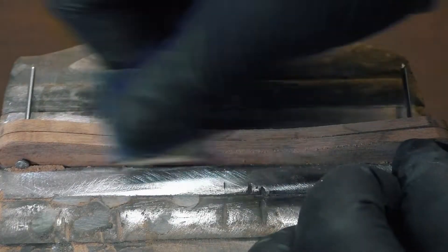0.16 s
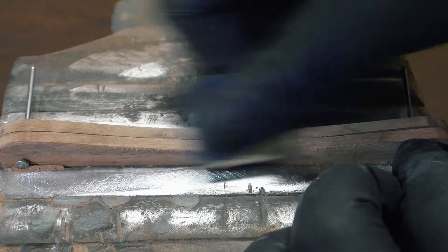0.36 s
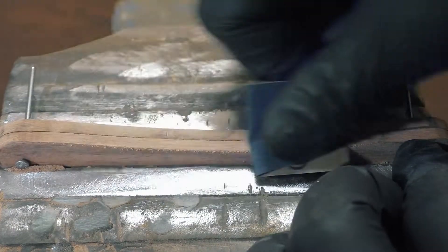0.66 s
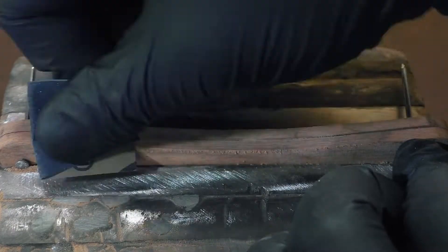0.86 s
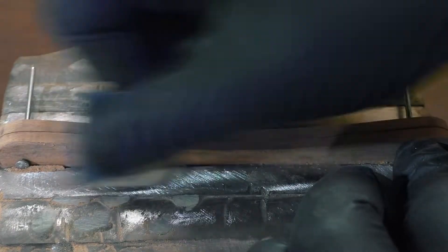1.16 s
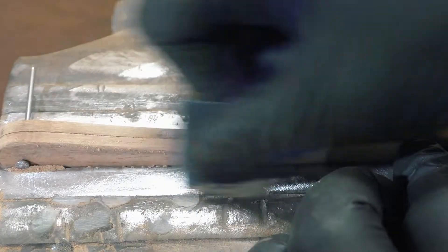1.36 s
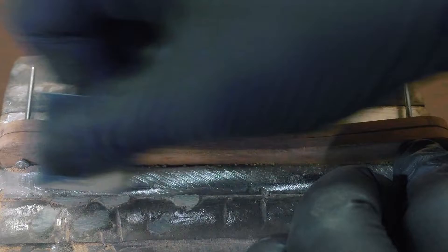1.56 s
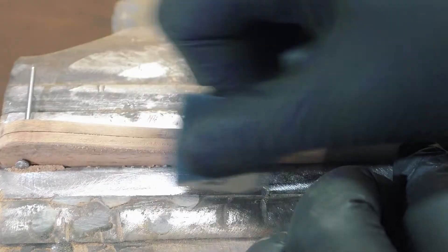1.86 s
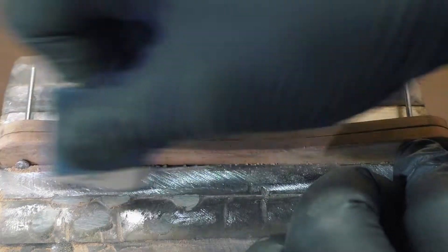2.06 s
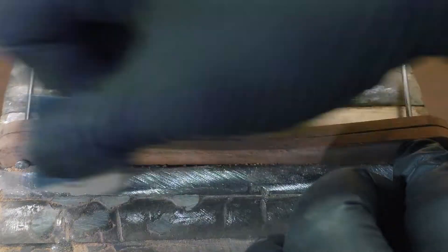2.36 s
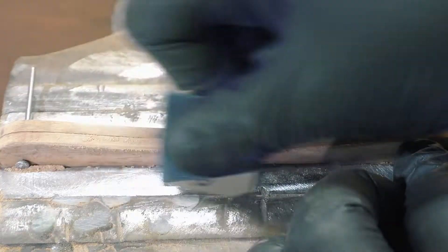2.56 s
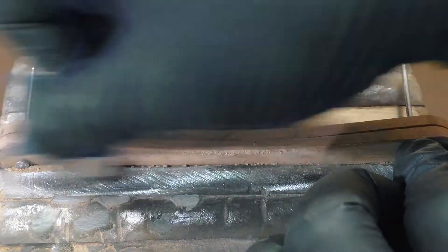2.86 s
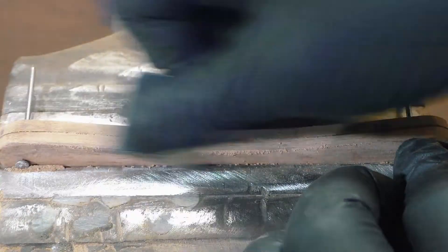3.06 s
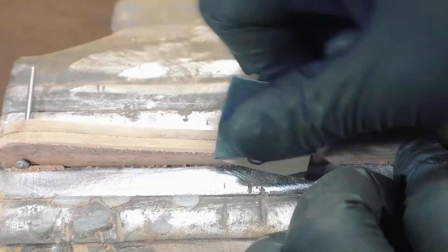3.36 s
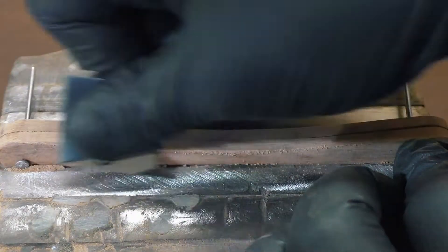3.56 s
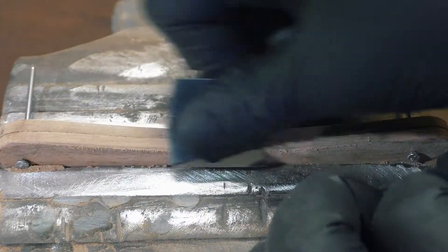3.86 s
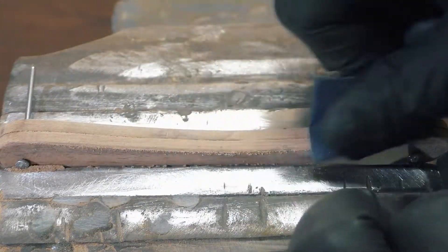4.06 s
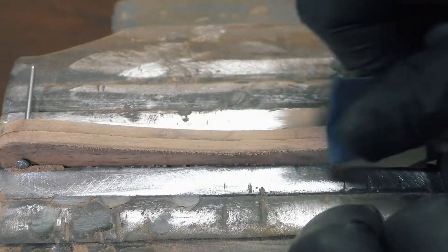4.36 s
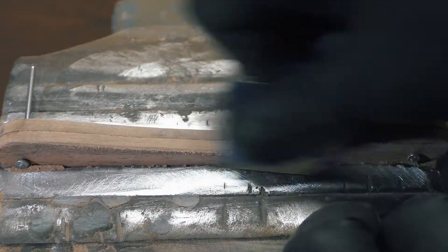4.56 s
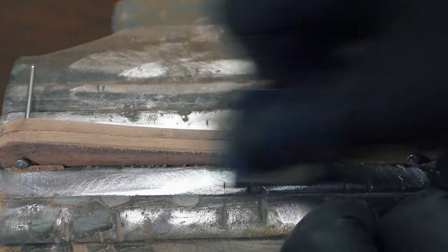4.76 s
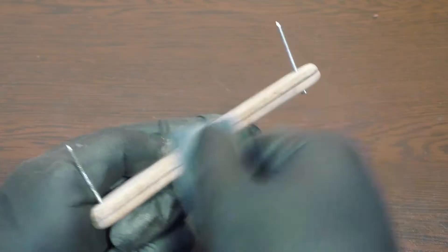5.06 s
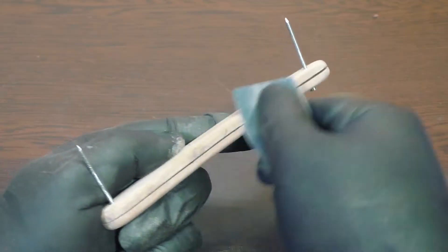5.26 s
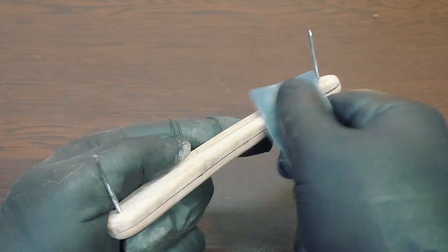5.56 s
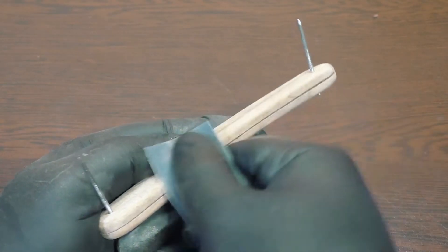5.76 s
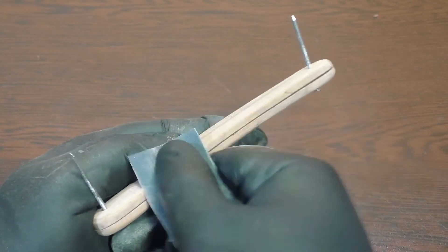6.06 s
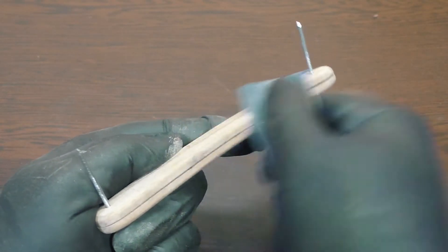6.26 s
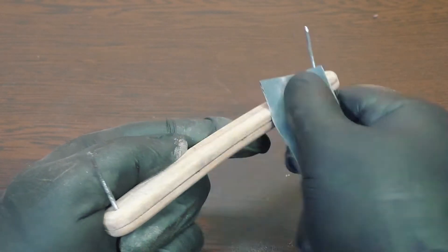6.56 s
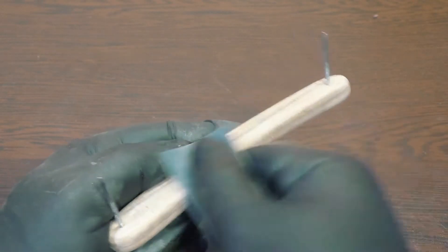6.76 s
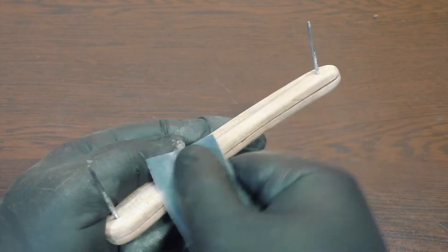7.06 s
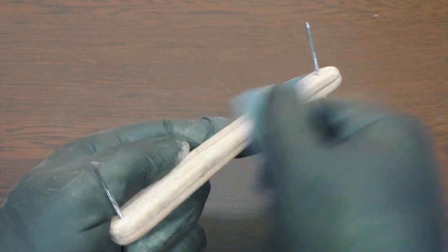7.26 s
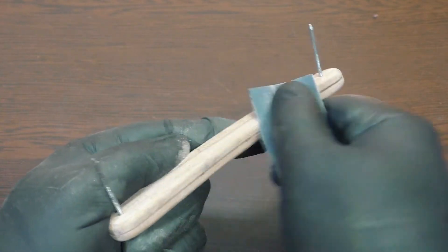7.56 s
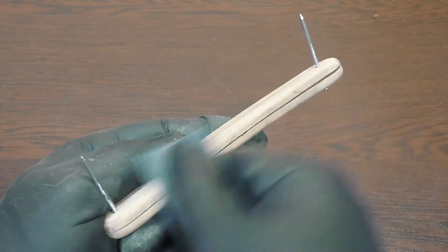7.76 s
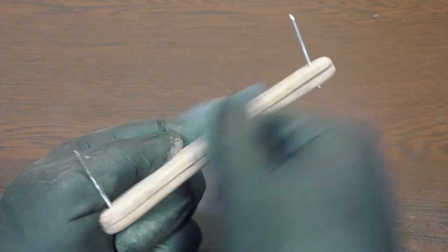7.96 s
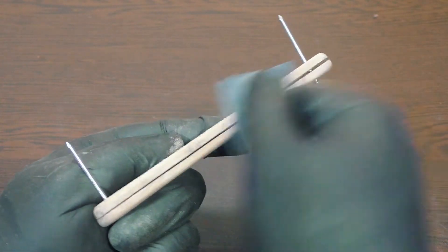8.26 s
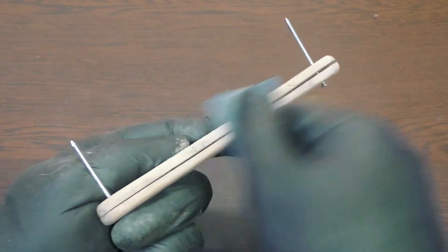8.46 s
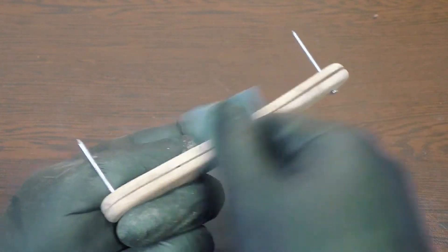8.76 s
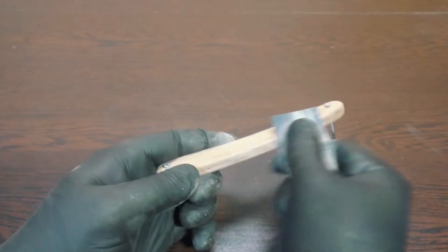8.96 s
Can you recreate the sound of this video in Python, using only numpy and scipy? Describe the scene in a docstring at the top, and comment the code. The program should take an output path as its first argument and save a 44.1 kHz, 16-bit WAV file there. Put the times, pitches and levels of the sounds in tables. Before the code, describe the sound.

Steady quick sanding, five or six strokes a second, each a swelling gritty hiss that nearly stops at the turn. First thin and airy on a vice, then slightly louder, with a hollow woody midrange when hand-held. Short squeaky snags, small clicks and light knocks interrupt it; gloved hands add barely audible dull rustle. Close microphone, slightly left, with only a faint room tail.

```python
"""You first hear sandpaper rubbed to and fro on a small wooden handle, close by, on a steel vice; later it is held in hand.
Each stroke is made from grit noise that follows the speed and pressure of the hand and rings the wood and the paper.
The paper snags, coarse grains snap and the handle knocks, each with a burst or a short ring.
Gloved hands add dull noise and soft thuds. The rubbing is a little hollow; a faint room tail follows it."""
import sys
import numpy as np
from scipy import signal
from scipy.fft import rfft, irfft, next_fast_len
from scipy.io import wavfile
from scipy.ndimage import uniform_filter1d, map_coordinates

SR = 44100
rng = np.random.default_rng(int(sys.argv[2]) if len(sys.argv) > 2 else 0)


def int16_out(signal):
    """Quantize to a 16-bit WAV file."""
    q = np.round(np.clip(np.atleast_2d(signal).T, -1, 1) * 32767)
    wavfile.write(sys.argv[1], SR, q.astype(np.int16))


N = 402633  # length [samples]

# Strokes, to and fro in turn; levels are relative:
# (start [s], pressure [dB], lean towards the stroke's end [dB], wood ring [dB], paper ring [dB])
STROKE_TABLE = [(-0.011, -44.5, 1.5, 7.5, 8.5), (0.168, -42.5, 3.5, -0.5, 11),
                (0.354, -38.0, 3.5, -5.5, 6.5), (0.554, -37, 3.5, -3.5, 6), (0.74, -43, -2, 0.5, 8),
                (0.929, -42, 3, -1.5, 1.5), (1.11, -42, 4.5, 2, 4.5), (1.299, -43, 5.5, 1.5, 15.5),
                (1.486, -43.5, -10, 4.5, 11.5), (1.692, -46.5, 11.5, 6, 11.5),
                (1.882, -43.0, -1.5, 6.5, 11.5), (2.07, -45.0, 2.5, 2.5, 4.5), (2.264, -42.0, 0, 5.0, 10.5),
                (2.487, -52, 4.5, 12.5, 15.5), (2.654, -50, -9, 11.5, 13.5), (2.851, -40.5, 5, 0, 1.5),
                (3.051, -39.0, 0, -1, 1.5), (3.238, -40, 0, 0, 5.5), (3.438, -43, -2, 2.5, 1.5),
                (3.597, -42.5, 5, 1.0, 5.5), (3.797, -44.5, -2.5, 2, 10), (3.945, -40.5, 1, -1.5, 2),
                (4.109, -42.5, 1, -0.5, 2.5), (4.255, -40.5, 0, -1, 3), (4.409, -43.5, 3.5, 2.5, 2.0),
                (4.569, -41.5, 0, 2, 6.5), (4.726, -43.5, 5, 3, 1.5), (4.885, -41.0, -0.5, 2.0, 3),
                (5.049, -35.5, 2, -5, 1), (5.186, -39.5, -1.5, -1, 3), (5.361, -41.5, -1.5, 6.5, 5.5),
                (5.502, -42.5, 0.5, -1.5, 2), (5.651, -42, 2.5, 1, 3), (5.823, -37.0, 1.5, -2.5, 5.5),
                (5.98, -34, 1.5, -9.5, 4), (6.138, -38.0, 1, -4.5, 2.5), (6.297, -36.0, 4, -9, 1.5),
                (6.47, -35.5, 2.5, -9.5, 0.5), (6.638, -43.5, 0.5, 2.5, 6.5),
                (6.799, -41.5, -0.5, 0.5, 2.0), (6.959, -40.5, 5, 3.0, 3.5), (7.124, -38.5, 2.5, -5.5, 1.5),
                (7.281, -41.5, 0, 3.5, 4.5), (7.45, -40, -1, -3.5, 3), (7.619, -41, 2.5, -1, 3.5),
                (7.787, -39.5, -1, -1, 1.0), (7.955, -39.5, 3, -3, 1.0), (8.124, -39.0, -0.5, -5.0, 0.5),
                (8.289, -37.5, 2.5, -7.5, 1.5), (8.438, -35.5, 1, -8, -2), (8.599, -39.5, 3.5, -2.5, -1.0),
                (8.757, -43.0, 6, 10, 1.5), (8.835, -42.5, -6.5, -7.5, -2.5),
                (8.897, -43.5, -2.5, -10.5, -8.5), (9.019, -44, -2, -14, -7)]
LAST_STROKE_END_S = 9.145
IN_HAND_S = 5.046  # from here the handle is held in the hand instead of on the vice

# Basic colour of the rubbing in each position: (frequency [Hz], relative level [dB])
VICE_COLOUR = [(200, -27), (600, -34.5), (850, -28), (1300, -13.5), (2000, -10), (2600, -8), (3500, -6),
               (5000, -8.5), (6200, -9.5), (8300, 0.5), (11000, 1.5), (13500, -3), (15700, -10)]
HAND_COLOUR = [(200, -60), (600, -33), (850, -22.5), (1200, -7.5), (1900, -9.5), (2250, -2.5), (2700, -5.5),
               (4400, -2.5), (5300, -8.5), (7200, -6.5), (8600, 0.5), (11000, 3), (15700, -5.5)]

# The paper's edge catches and the scrape flares:
# (time [s], half length [s], boost [dB], centre [Hz], width [natural log of frequency ratio])
SNAG_TABLE = [(.392, .028, 12, 3200, 0.38), (.525, 0.027, 7, 1400, 0.33), (1.257, 0.015, 8.5, 9000, 1.35),
              (1.26, 0.054, 13, 1400, 0.37), (1.322, 0.018, 6, 5000, 0.92), (1.345, 0.033, 9.5, 1600, 0.31),
              (2.297, 0.034, 12.5, 2060, 0.34), (2.46, 0.039, 5.5, 1270, 0.27),
              (3.408, .02, 9.5, 3000, 0.69), (3.735, 0.036, 8.5, 3000, 0.73),
              (5.143, 0.023, 12, 1170, 0.64), (5.459, 0.029, 8, 2700, 0.34), (6.76, 0.023, 8, 2400, .4),
              (7.1, 0.0084, 10, 2490, 0.34), (7.415, 0.0092, 9, 6000, 2.8), (7.751, 0.017, 15, 2420, 0.17),
              (7.762, 0.023, 17, 5700, 0.21), (7.816, 0.016, 15.5, 2350, .16),
              (8.095, .017, 12.5, 2320, 0.12), (8.818, 0.007, 1, 5000, 0.84)]

# Coarse grains snap and the handle is knocked: (time [s], snap, relative [dB], knock, relative [dB])
TICK_TABLE = [(.383, -42, -50), (1.259, -25, -58), (1.538, -23, -58), (1.577, -21, -58), (5.059, -58, -46),
              (5.075, -52, -29.5), (5.782, -46, -42), (5.799, -31, -27.5), (6.044, -30, -50),
              (8.826, -40, -41)]

# What the handle rings with, damped by the glove: (frequency [Hz], relative level [dB], time to fall 60 dB [s])
HANDLE_MODES = [(1276, -7, .011), (1800, -5, .006), (2305, -3, .028), (2900, -3, .006), (3731, -9, .01),
                (4400, -16, .015)]

# Colours of the hands' dull noise and of their deep thud: (frequency [Hz], relative level [dB])
HANDLING_COLOUR = [(70, -15), (120, -4.5), (180, -2), (300, -2.5), (450, -3), (580, -11.5), (800, -9.5),
                   (1500, -7.5), (4000, -35)]
THUD_COLOUR = [(15, -25), (35, -4), (55, -7.5), (80, -1.5), (120, -14), (220, -28), (600, -60)]

# Where the pad works, as a level difference: (time [s], left minus right [dB])
PAD_PAN = [(0, 2.2), (1.3, 3.1), (3.2, 3.1), (3.8, 1.7), (4.8, 2), (5.1, 2.8), (8.2, 3), (9.13, 2.3)]

# Sound the two microphone ports do not share: (frequency [Hz], unshared against shared sound [dB])
PORT_WIDTH = [(100, -4), (300, -4.5), (600, -6), (1000, -8), (2000, -18.5), (4000, -15.5), (8000, -29.5),
              (13000, -11)]
# Colour difference between the ports: (frequency [Hz], left minus right [dB])
PORT_BALANCE = [(60, 1), (250, -0.7), (600, -1.5), (1000, -5.5), (2000, -2.6), (7000, -3.4), (13000, -1.1)]

# A piece this small radiates almost no bass: (frequency [Hz], level [dB])
SMALL_PIECE_COLOUR = [(200, -40), (650, -25), (1200, -9.5), (2000, -3.5)]

# The scrape's level dips briefly: (from [s], to [s])
DIP_SPAN = (8.827, 8.844)

# Strength of the delayed copy that makes the hollow colour: (frequency [Hz], delayed share [dB])
HOLLOW_COLOUR = [(60, -7.5), (350, -3), (1100, -9), (3000, -9.5), (12000, -9.5)]
HOLLOW_DELAY_S = .017415

# Wood resonances that sway as the pad travels; the hand's peaks and swings are scaled by the ring depth below:
# (centre [Hz], sway [Hz], width [Hz], peak [dB], swing of the peak [dB])
VICE_RESONANCES = [(1570, -70, 450, 0.5, 0.5), (3040, 204, 500, -2, 2.5), (4880, -300, 300, 3, -1.5)]
HAND_RESONANCES = [(2310, 50, 65, 1.9, 0.36), (4280, 77, 380, 0.93, 1)]

# Each way of holding the paper lasts for a run of strokes: (from [s], paper resonance [Hz],
# treble tilt [dB per octave], creep left at the turns [dB], extra wood ring at the far end [dB])
GRIP_TABLE = [(0, 3200, -.5, -20, 4), (1.3, 5630, 4, -21, 2.3), (2.85, 3240, -2, -17, 1.7),
              (3.95, 3200, -3, -21.5, 0.5), (5.05, 4630, -1, -20.5, 1.7), (5.5, 2970, -2.5, -18, -0.7),
              (6.64, 3850, -3, -16.5, 0.5), (8.83, 2970, -2.8, -7, 6.5)]

# The gloves shift or ease their hold and the dull noise swells or sinks:
# (time [s], half length [s], boost [dB], centre [Hz], width [natural log of frequency ratio])
GLOVE_SHIFTS = [(1.3, 0.072, 7, 170, 1.2), (3.21, 0.092, 8.5, 350, .7), (3.59, 0.14, 10, 400, .9),
                (4.15, 0.064, 15, 240, 1), (4.38, 0.11, 8, 270, .6), (4.94, .09, 17, 78, 0.37),
                (5.42, .06, 6.5, 200, 0.83), (5.74, 0.13, 10, 169, 0.58), (7.4, 0.043, 6, 110, 1.0),
                (7.75, 0.053, 9, 100, .9), (7.86, 0.091, 12, 292, 0.3), (8.25, 0.2, 8.5, 90, 1),
                (8.8, 0.036, 14, 600, 0.66), (9.0, .16, 7, 58, .35), (9.06, .16, -6, 280, .9)]

FRAME, HOP = 512, 128  # short overlapping slices for colouring the scrape [samples]
TOP_HZ = 15800  # the finished sound is cut above this
BITE_DB, WOOD_BITE_DB = 1.5, 3.5  # grit bites and wood is shaken harder near the turns
LEAN_IN_WOOD = 0.12  # share of the hand's lean that the wood ring follows
OUTWARD_TILT_DB = 1.05  # per octave: outward strokes are brighter, return strokes duller
LATE_PEAK = 0.029  # slow gathering, fast braking: shift of the top speed, as a share of the stroke
DULLEST_SPEED = 0.16  # share of the top speed below which the hiss gets no duller
PAPER_GLIDE = 0.029  # how far the paper's broad resonance follows the pad, as a share of its pitch
LOOSE_RING = .08  # per dB of wood ring: a loosely held handle rings with taller peaks
RING_DEPTH = 1.5  # height factor of the hand-held resonances at zero wood ring


def undb(db):
    """Turn decibels into gain."""
    return 10 ** (np.asarray(db) / 20)


def colour(points, hz):
    """Read the level in dB between colour points, on a logarithmic frequency scale."""
    point_hz, point_db = np.transpose(points)
    return np.interp(np.log(np.maximum(hz, 1)), np.log(point_hz), point_db)


def tint(x, points):
    """Filter a sound by making each frequency stronger or weaker."""
    size = next_fast_len(N + 4096)
    hz = np.arange(size // 2 + 1) * SR / size
    return irfft(rfft(x, size) * undb(colour(points, hz)), size)[..., :N]


def walk(rate_hz):
    """Wander between random points, rate_hz of them each second, with a spread near 1."""
    steps = rng.standard_normal(N // 8)
    return 1.06 * np.interp(np.arange(N) / SR * rate_hz, np.arange(len(steps)), steps)


def ports(pair):
    """Make left and right from a shared sound and an unshared one of opposite sign."""
    side = tint(pair[1], PORT_WIDTH)
    return np.array([pair[0] + side, pair[0] - side])


def travel(t):
    """Count strokes done so far and swing the pad like a pendulum: place 1 is near, -1 is far."""
    turns = np.r_[np.array(STROKE_TABLE)[:, 0], LAST_STROKE_END_S]
    stroke = np.interp(t, turns, np.arange(len(turns)))
    return stroke, np.cos(np.pi * stroke)


def flares(rows, hz, t):
    """Give brief level changes in dB, each in its own part of the spectrum."""
    s, half, boost_db, centre, width = np.transpose(rows)
    in_time = np.exp(-np.minimum(((t[:, None] - s) / half) ** 2, 20))
    in_pitch = np.exp(-(np.log(hz / centre) / width) ** 2)
    return boost_db * in_pitch @ in_time.T


def room(x, t60_s, wet_db):
    """Walls send back a faint fading tail of noise, different at each port."""
    t = np.arange(SR // 2) / SR
    tail = rng.standard_normal((2, len(t))) * undb(-60 * t / t60_s)
    tail *= undb(wet_db) / np.sqrt(np.sum(tail ** 2, axis=1, keepdims=True))
    return x + signal.fftconvolve(x, tail, axes=1)[:, :N]


def hollow(x):
    """A weaker, coloured copy just behind the sound strengthens and weakens evenly spaced frequencies."""
    lag = int(round(HOLLOW_DELAY_S * SR))
    late = np.pad(tint(x, HOLLOW_COLOUR), ((0, 0), (lag, 0)))
    return x + late[:, :N]


def hands(handling_db, thud_db, far_turn_db, palm_hz, palm_db):
    """Gloves and work shift under the strokes: dull noise over a deep thud."""
    noise = 0
    for points, level_db in ((HANDLING_COLOUR, handling_db), (THUD_COLOUR, thud_db)):
        layer = tint(rng.standard_normal((2, N)), points)
        noise = noise + layer / layer.std() * undb(level_db)
    hz, t, frames = signal.stft(noise, SR, nperseg=2048)
    hz = np.maximum(hz, 1)[:, None]
    # on the vice the work is pushed hardest at the far turn; in the hand, the palm adds a low boom
    pushed = -far_turn_db * travel(t)[1]
    palm = palm_db / (1 + (hz / palm_hz) ** 4)
    db = np.where(t < IN_HAND_S, pushed, palm) + flares(GLOVE_SHIFTS, hz, t)
    sound = signal.istft(frames * undb(db), SR)[1]
    return ports(sound[:, :N])


def ticks(snap_hz, snap_t60_s, splinter_db):
    """A coarse grain gives a very short, slightly noisy snap; a knock makes the handle ring."""
    t = np.arange(4096) / SR
    ring = sum(undb(db - 60 * t / t60) * np.sin(2 * np.pi * hz * t) for hz, db, t60 in HANDLE_MODES)
    out = np.zeros(N + len(t))
    for s, snap_db, knock_db in TICK_TABLE:
        splinters = undb(splinter_db) * rng.standard_normal(len(t))
        snap = (np.sin(2 * np.pi * snap_hz * t) + splinters) * undb(-60 * t / snap_t60_s)
        i = int(s * SR)
        out[i:i + len(t)] += undb(snap_db) * snap + undb(knock_db) * ring
    return tint(out[:N], SMALL_PIECE_COLOUR)


def grit(coarse_hz, coarse_db, chatter_hz, chatter_db, grain_hz, grain_db):
    """Countless fine scratches and some coarse ones; the pad chatters and rides over the wood's grain."""
    rare_hits = rng.standard_normal((2, N)) * (rng.random(N) < coarse_hz / SR)
    coarse = rare_hits * np.sqrt(SR / coarse_hz)
    scratches = rng.standard_normal((2, N)) + undb(coarse_db) * coarse
    x = scratches * undb(chatter_db * walk(chatter_hz) + grain_db * walk(grain_hz))
    return x / x.std()


def flutter(hz, stroke, spacing_hz, changes):
    """Flexing paper has fine resonances that shift a few times in each stroke; spread near 1."""
    field = rng.standard_normal((256, 512))
    spots = np.broadcast_arrays(hz / spacing_hz, stroke * changes)
    return 1.36 * map_coordinates(field, spots, order=1, mode="wrap")


def swaying(rings, hz, place):
    """Wood resonances, in dB, change pitch and strength with the pad's place."""
    db = 0
    for centre, sway, width, peak_db, swing_db in rings:
        offset = (hz - centre - sway * place) / width
        db = db + (peak_db + swing_db * place) / (1 + offset ** 2)
    return db


def dipped(x, drop_db):
    """The level dips briefly, with steep edges."""
    t = np.arange(N) / SR
    inside = 1. * ((t > DIP_SPAN[0]) & (t < DIP_SPAN[1]))
    return x * undb(drop_db * uniform_filter1d(inside, size=64))


def sanding(wood_hz, paper_width, hiss_power, wood_power, dulling_db, flutter_db, flex_db, glide, level_db):
    """Stroke speed and pressure drive grit noise, which the wood and the paper colour."""
    scrape = grit(coarse_hz=915, coarse_db=-11.5, chatter_hz=707.5, chatter_db=1.27,
                  grain_hz=69.64, grain_db=0.9)
    hz, t, frames = signal.stft(scrape.astype(np.float32), SR, nperseg=FRAME, noverlap=FRAME - HOP)
    hz = np.maximum(hz, 1)[:, None]
    start, pressure_db, lean_db, wood_db, paper_db = np.transpose(STROKE_TABLE)
    number = np.arange(len(start))
    middle = (start + np.r_[start[1:], LAST_STROKE_END_S]) / 2
    grips = np.array(GRIP_TABLE)
    _, paper_hz, tilt, creep_db, far_end_db = grips[np.searchsorted(grips[1:, 0], middle)].T
    stroke, place = travel(t)

    def held(level, lean=0, ends=0):
        """Hold a value through each stroke, with an optional slope or sag, and pass on at the turn."""
        early_midway_late = np.transpose([level - lean + ends, level, level + lean + ends])
        moments = np.add.outer(number, [.2, .5, .8])
        return np.interp(stroke, moments.ravel(), early_midway_late.ravel())

    # the hand all but stops at each turn
    swing = stroke - LATE_PEAK * np.sin(np.pi * stroke) ** 2
    speed = np.abs(np.sin(np.pi * swing)) + undb(held(creep_db))
    speed_db = 20 * np.log10(speed)
    # the wood carries the low part, which fades less than the hiss when the hand slows
    wood = 1 / (1 + (hz / wood_hz) ** 3)
    hiss_level = held(pressure_db, lean_db, BITE_DB) + speed_db * hiss_power
    wood_level = held(pressure_db + wood_db, LEAN_IN_WOOD * lean_db, WOOD_BITE_DB) + speed_db * wood_power
    db = (1 - wood) * hiss_level + wood * (wood_level - held(far_end_db) * place)
    # slow grit loses its highest treble first
    db += dulling_db * np.log2(np.maximum(speed, DULLEST_SPEED)) * np.maximum(np.log2(hz / 6000), 0)
    on_vice = colour(VICE_COLOUR, hz) + swaying(VICE_RESONANCES, hz, place)
    ring_depth = RING_DEPTH * np.exp(LOOSE_RING * held(wood_db))
    in_hand = colour(HAND_COLOUR, hz) + swaying(HAND_RESONANCES, hz, place) * ring_depth
    db += np.where(t < IN_HAND_S, on_vice, in_hand)
    # the grip sets the paper's broad resonance and its brightness
    paper_centre = held(paper_hz) * (1 + PAPER_GLIDE * place)
    db += held(paper_db) * np.exp(-(np.log(hz / paper_centre) / paper_width) ** 2)
    db += held(tilt + OUTWARD_TILT_DB * np.cos(np.pi * number)) * np.maximum(np.log2(hz / 7000), 0)
    db += flares(SNAG_TABLE, hz, t)
    # of the paper's finer resonances, the wider set glides up on one stroke and down on the next
    gliding_hz = hz * (1 + glide * place)
    db += flutter_db * flutter(hz, stroke, spacing_hz=149.7, changes=2)
    db += flex_db * flutter(gliding_hz, stroke, spacing_hz=614, changes=1.5)
    sound = signal.istft(frames * undb(db + level_db), SR, nperseg=FRAME, noverlap=FRAME - HOP)[1]
    return ports(sound[:, :N])


def scene():
    """Place the rubbing and its ticks in the room, over the dull noise of the hands."""
    pan_s, pan_points_db = np.transpose(PAD_PAN)
    pan_db = np.interp(np.arange(N) / SR, pan_s, pan_points_db)
    scrape = sanding(wood_hz=2300, paper_width=0.38, hiss_power=1.64, wood_power=0.59, dulling_db=2.5,
                     flutter_db=2.5, flex_db=1.77, glide=0.015, level_db=-0.5)
    work = dipped(hollow(scrape), drop_db=-4.0)
    work = work + ticks(snap_hz=5900, snap_t60_s=0.0035, splinter_db=-20)
    panned = work * undb(np.array([pan_db, -pan_db]) / 2)
    work_in_room = room(panned, t60_s=0.68, wet_db=-28.5)
    handling = hands(handling_db=-79.0, thud_db=-91, far_turn_db=0.4, palm_hz=210, palm_db=5)
    return work_in_room + hollow(handling)


def record(dry):
    """Give the two ports slightly different colours and cut the top."""
    pair = []
    for x, sign in zip(dry, (1, -1)):
        pair.append(tint(x, [(hz, sign * db / 2) for hz, db in PORT_BALANCE]))
    top_cut = signal.ellip(12, .1, 80, TOP_HZ, fs=SR, output="sos")
    return signal.sosfilt(top_cut, pair)


dry = scene()
out = record(dry)
int16_out(out)
```